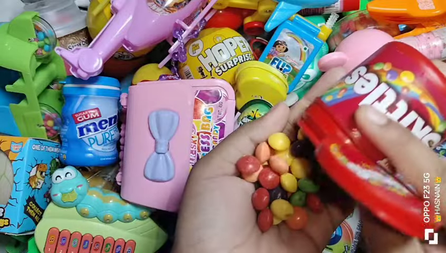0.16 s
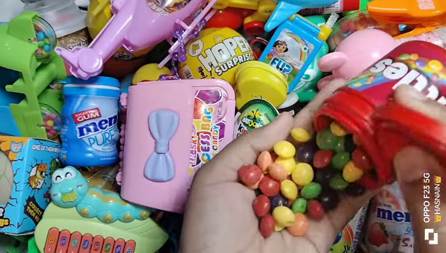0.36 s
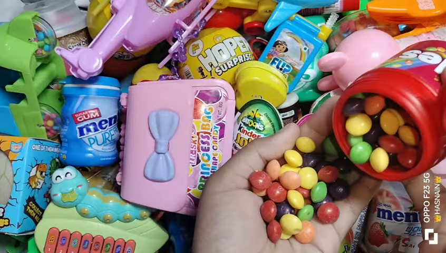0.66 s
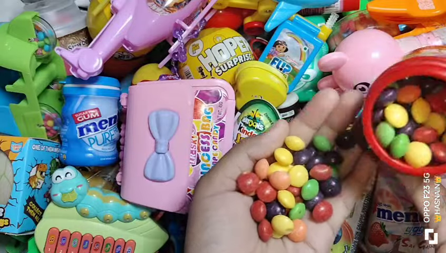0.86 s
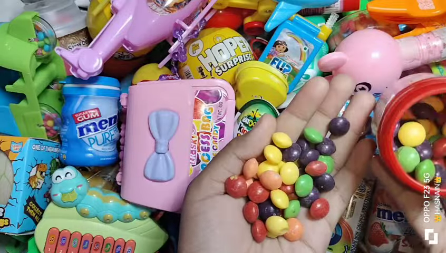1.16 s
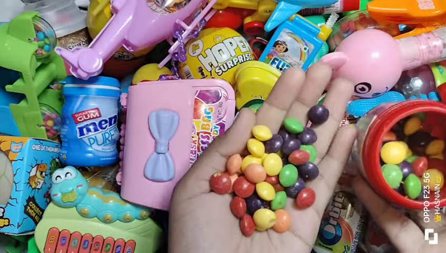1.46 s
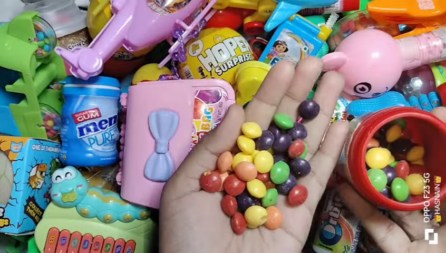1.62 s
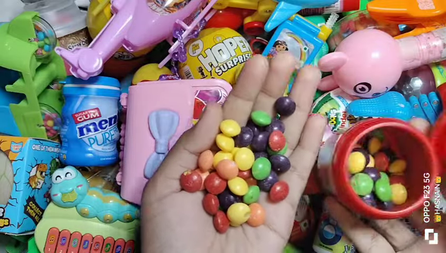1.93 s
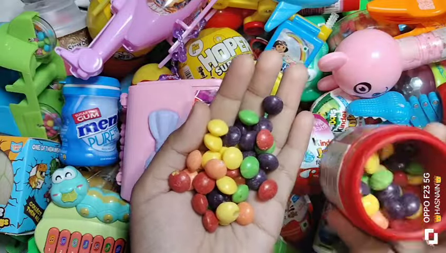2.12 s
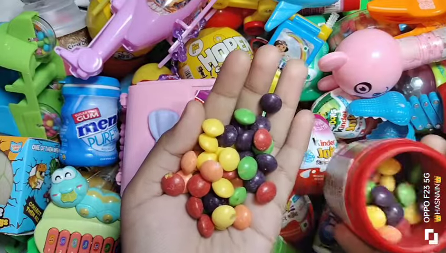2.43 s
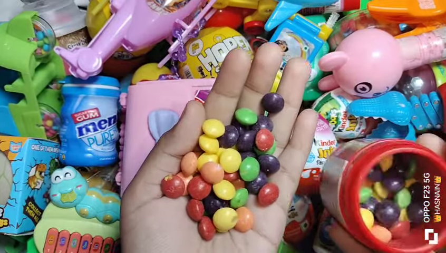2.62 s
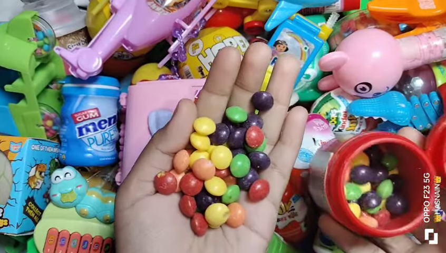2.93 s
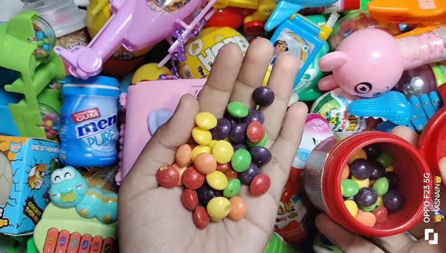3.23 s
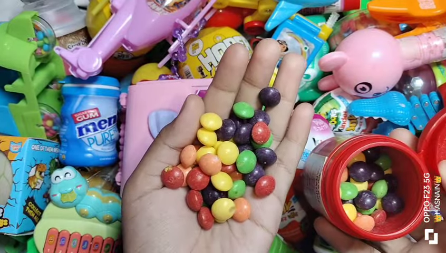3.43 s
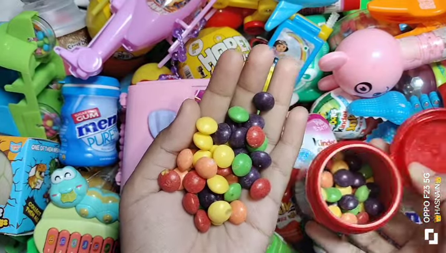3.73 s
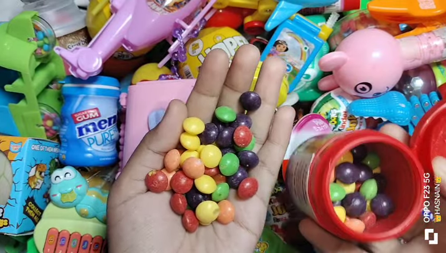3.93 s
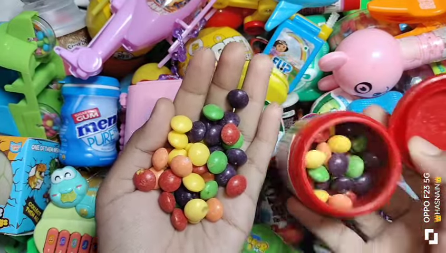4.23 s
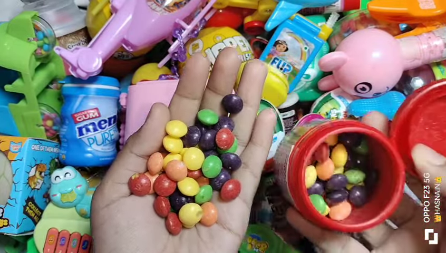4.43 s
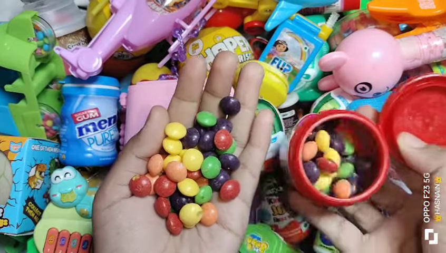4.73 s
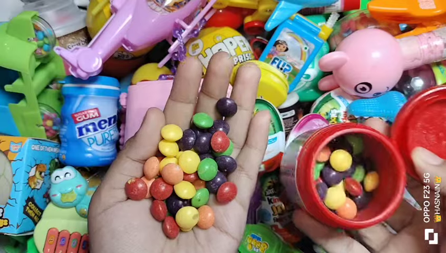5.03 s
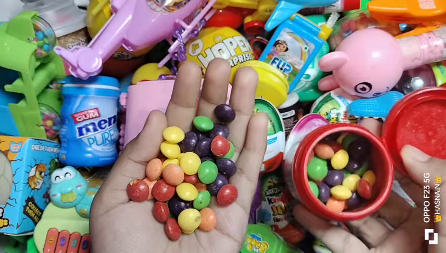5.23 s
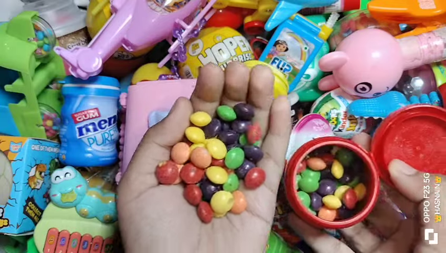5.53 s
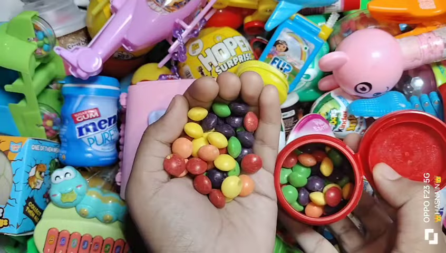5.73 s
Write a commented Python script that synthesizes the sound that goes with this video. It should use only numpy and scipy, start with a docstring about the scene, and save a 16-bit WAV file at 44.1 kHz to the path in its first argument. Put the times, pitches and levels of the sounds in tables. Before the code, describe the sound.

Close up in a small, reflective room, candies hiss and click quietly as they pour, then knock hollowly inside a thin plastic jar. After a brief lull and a rustly slide, the jar is tossed in two series of short crunchy rattles separated by a near-silent gap, ending with settling ticks and faint room drone.

```python
"""Sugar-shelled sweets collide in an open plastic jar: each blow excites the air, the wall and the hard shells.
They slide into a palm, roll back, and are tossed in the jar in two runs of shakes, each a short hail of blows.
Air and wall sound as decaying sine modes, shells as noise bursts with a ping, slides as coloured grains of noise.
The jar is close, off to the right, in a small live room with a faint low drone made of filtered noise."""
import sys
import numpy as np
from scipy import signal
from scipy.fft import rfft, irfft, next_fast_len
from scipy.io import wavfile
from scipy.ndimage import uniform_filter1d, minimum_filter1d

SR = 44100
rng = np.random.default_rng(int(sys.argv[2]) if len(sys.argv) > 2 else 0)


def file_out(sig):
    """Save sig as 16-bit WAV at sys.argv[1]."""
    # one column per channel
    cols = np.atleast_2d(sig).T
    # limit, then scale
    lim = np.clip(cols, -1, 1)
    pcm = np.round(lim * 32767).astype(np.int16)
    wavfile.write(sys.argv[1], SR, pcm)


N = 258867
RING = np.arange(1536) / SR  # time axis of one blow, s
TIME = np.arange(N) / SR  # time axis of the scene, s

# Levels in the tables are relative: mixing and radiation scale them further.
# Single blows that stand out; hardness is shell over air, below 0 a dull blow on the jar:
# [start_s, level_db, hardness_db, wall_extra_db]
KNOCKS = [(.0638, -45, 2, -11), (.078, -42, 1, -3), (.1295, -39, -2, -4), (0.142, -31.5, -1, 0),
          (.1673, -40, -13, -3), (.327, -43, 3, -2), (0.355, -38, -1, -16), (0.39, -38, -3, -10),
          (.4305, -32, -25, 1), (.4449, -31, -5, -5), (.4718, -33.5, -8, -4.5), (.5353, -32.5, -4.5, -13),
          (.6005, -45, 18, -14), (.6317, -41, -12, -9), (.6574, -42, 8, -6), (.7175, -52.5, 23, -10),
          (.8968, -39, -8, -4), (.928, -35, -22, 8), (.9546, -28.5, -11, 6.5), (.9611, -30, -24.5, -4),
          (.987, -17, -10.5, -6), (.9993, -26, -17, 2), (1.0127, -31, -14, 1), (1.0225, -37, 15, 6),
          (1.0524, -27.5, -20.5, -3), (1.0712, -25, -21.5, -2), (1.0799, -24, -16, -3),
          (1.0957, -24, -12, 4), (1.1068, -30.5, -12, 4), (1.1378, -31.5, -5, -2), (1.175, -25, -6.5, -1.5),
          (1.1828, -41, 4, 9), (1.2319, -26, -7, -11), (1.2363, -26, -4, -2), (1.285, -39, -10.5, 5),
          (1.2911, -21.5, -8, 2), (1.3065, -34.5, 2, 2), (1.3659, -33.5, -5, 0.5), (1.3741, -38, 1, -2),
          (1.4127, -40.5, -15, 2), (1.6059, -51, -8, 3), (1.712, -64, 16, -10), (1.7712, -60, 16.5, -7.5),
          (1.8164, -42, -2, 2.5), (1.8337, -50, -2, -3.5), (1.9062, -43, 0, -4), (1.9368, -41, -10, 1.5),
          (2.0507, -44, -13, 8), (2.0846, -33.5, 2, -3), (2.1026, -31.5, -5, 0.5), (2.1187, -33.5, 1, 1),
          (2.153, -30, -5, -3), (2.2591, -28, -11, 3), (2.3461, -40, 11, 2), (2.4324, -28.5, -9, -9.5),
          (2.4422, -32, -22, 1), (2.449, -22, -11, 2), (2.6462, -36.5, -14, 9.5), (2.7176, -32, 1.5, 0),
          (2.9836, -39, -23, 6), (3.0414, -35, -3, 5.5), (3.1128, -54.5, 18, 9), (4.0206, -36, -11, -5.5),
          (4.0515, -24.5, -5.5, -14.5), (4.0579, -32, -11, 0), (4.0699, -28.5, -5, -7.5),
          (4.3456, -41.5, 7, -7.5), (4.5558, -25.5, -6, -14.5), (4.5649, -23, -1, -14),
          (4.7701, -25, -12, -17), (5.2101, -26, -10, -19), (5.228, -32, -11, -6), (5.235, -30.5, -20, 0),
          (5.6388, -60, -2, -6), (5.7042, -60, 24, -8.5), (5.8075, -62.5, 15.5, -6)]
# The heap lands in the jar; loose_db is the jostling of the sweets beforehand:
# [first_s, bulk_s, last_s, level_db, hardness_db, wall_extra_db, loose_db]
SHAKES = [(2.267, 2.2718, 2.279, -27, -2.5, 6.5, -44), (2.456, 2.4608, 2.4728, -16.5, -8, -1.5, -43),
          (2.6662, 2.6798, 2.688, -27.5, -5.5, 2.5, -38.5), (2.8342, 2.8399, 2.858, -22.5, -11, 3, -41),
          (3.019, 3.0207, 3.0268, -36.5, -10, 4.5, -44), (4.0915, 4.105, 4.1197, -15, -7, 2, -53.5),
          (4.363, 4.377, 4.3896, -15, -4.5, 0.5, -42), (4.601, 4.613, 4.626, -13, -8, -0.5, -35),
          (4.8218, 4.824, 4.845, -17.5, -4, 2, -30.5), (5.0361, 5.0545, 5.07, -25.5, -1.5, 2, -39),
          (5.2503, 5.267, 5.286, -24.5, -0.5, 4, -37)]
# Modes of the air in the jar, before random weighting: [ratio_to_air_note, level_db, t60_s]
AIR_MODES = [(.94, -8.5, .018), (1.0, 15.5, 0.027), (1.14, -1, 0.049)]
# Modes of the plastic wall, before random detuning and weighting: [pitch_hz, level_db, t60_s]
WALL_MODES = [(1416, 1.5, 0.021), (1720, -3.5, 0.025), (1770, -1.5, 0.018), (2210, -2.5, 0.013),
              (2300, -10.5, 0.029), (2453, -2, 0.035), (2621, -1.5, 0.07), (2871, 4, 0.024),
              (3150, 3, 0.012), (3693, -8.5, 0.028), (3630, -6.5, 0.006), (4320, -1.5, 0.01),
              (4950, -8.5, 0.014), (5750, -10, 0.017)]
# Spectrum of a shell's crack: [frequency_hz, gain_db]
SHELL_SPECTRUM = [(300, -41.5), (1500, -3.5), (3000, -8), (4200, -2.5), (5200, -2.5), (6300, -3),
                  (7500, -5.5), (9000, -11.5), (12000, -10.5), (14500, -17.5), (16000, -36.5)]
# Path of the jar; the note is lower while the palm covers the mouth:
# [time_s, air_note_hz, right_minus_left_db]
JAR_PATH = [(0, 863, 0), (.45, 907, -1), (1.1, 1042, 0), (1.4, 1113, 1), (3.0, 1097, 1.5),
            (4.6, 1028, -0.5), (5.301, 1068, 0)]
# The jar is tilted and the heap slides: [start_s, fastest_s, end_s, hiss_db, rub_db, tumble_db]
SLIDES = [(0, 0.145, .3, -38.5, -33.5, -44), (.28, .34, 0.48, -50, -47, -48.5),
          (.47, 0.544, 0.8, -42, -46.5, -46), (0.866, 1.08, 1.27, -42.5, -39, -33),
          (1.22, 1.317, 1.5, -53, -50, -47), (1.48, 1.6, 1.67, -77, -64, -56.5),
          (2.02, 2.104, 2.155, -31, -43.5, -36)]
# Spectrum of sliding shells: [frequency_hz, gain_db]
HISS_SPECTRUM = [(500, -28), (1500, -8.5), (3000, -0.5), (4500, -2), (6300, -0.5), (9000, -5), (12000, -4),
                 (14500, -8), (16000, -15.5)]
# Spectrum of the rubbed jar wall: [frequency_hz, gain_db]
RUB_SPECTRUM = [(200, -11), (500, -3), (680, 0), (850, 10.5), (1050, 4), (1300, 3.5), (2000, -0.5),
                (3500, -4.5), (6500, -12), (16000, -33)]
# Decay of the room: [frequency_hz, t60_s]
ROOM_T60 = [(300, 0.84), (1100, 0.72), (3000, 0.52), (6000, 0.67), (14000, 0.27)]
# Spectrum of the diffuse reverberation: [frequency_hz, gain_db]
ECHO_SPECTRUM = [(200, 1.5), (700, 3.5), (950, -3.5), (1200, 2.5), (1500, -6.5), (1900, 2), (2700, 0.5),
                 (6000, -3), (10000, -1), (16000, 4.5)]
# Spectrum of the dull room noise: [frequency_hz, gain_db]
DRONE_SPECTRUM = [(20, -20), (35, 6), (55, 0), (75, -9.5), (120, 7), (180, -4.5), (240, -1.5), (390, -6.5),
                  (520, -8.5), (700, -8), (1200, -14.5), (3000, -26.5), (5000, -41.5), (14000, -55.5)]
# Wavering hum in the room: [pitch_hz, width_hz, level_db]
HUM = [(123.5, 11, -60.5), (237, 10, -70), (390, 44, -69.5)]


def collisions(rows, release_s=0.009):
    """Superposition of impacts: a harder contact trades the boom of the air for the tick of the shell."""
    out, count = np.zeros((2, N)), len(rows)
    jar_s, jar_hz, _ = np.transpose(JAR_PATH)
    air_note_hz = np.interp(np.array(rows)[:, 0], jar_s, jar_hz)
    airs, walls, shells = boom(air_note_hz, count), clack(count), tick(count)
    # fade the end of each ring to silence so that it stops without a click
    taper = np.minimum((RING[-1] - RING) / release_s, 1) ** 2
    for (start_s, level_db, hard_db, wall_db), air, wall, shell in zip(rows, airs, walls, shells):
        blow = undb(-hard_db / 2) * air + undb(wall_db) * wall + undb(hard_db / 2) * shell
        add(out, start_s, taper * undb(level_db) * blow)
    return out


def boom(air_note_hz, count, scatter=.03):
    """Cavity resonance: a blow rings the air modes, and the shifting heap varies their pitch."""
    detune = 1 + scatter * rng.standard_normal((count, 1, 1))
    weights = 1 + 0.9 * rng.standard_normal((count, len(AIR_MODES)))
    phase = 2 * np.pi * air_note_hz[:, None, None] * detune * RING
    ring = 0
    for k, (ratio, db, t60_s) in enumerate(AIR_MODES):
        mode = undb(db) * fade(t60_s) * np.sin(ratio * phase)
        ring = ring + weights[:, k, None, None] * mode
    return attack_level(ring)


def clack(count, apart=1.0, right_db=1.5, scatter=0.026):
    """Modal vibration: each struck spot weights the wall modes; the heap detunes them."""
    hz, db, t60_s = np.transpose(WALL_MODES)
    detuned_hz = hz * (1 + scatter * rng.standard_normal((count, len(hz))))
    phase = np.float32(2 * np.pi * detuned_hz[..., None]) * np.float32(RING)
    modes = np.float32(fade(t60_s[:, None])) * np.sin(phase)
    # one mix shared by both channels, plus one for each: the wall radiates unevenly
    spot = rng.standard_normal((count, 3, len(hz)))
    weights = undb(db) * (spot[:, :1] + apart * spot[:, 1:])
    return attack_level(np.float32(weights) @ modes * undb([[0], [right_db]]))


def tick(count, crack_t60_s=0.0076, rattle_t60_s=0.064, rattle_db=-15, rise_s=0.00088,
         ping_hz=(4000, 14000), ping_t60_s=.02, ping_db=-8):
    """Hard contact: a noise crack, its scatter inside the jar, and a ping pitched by the sweet."""
    scatter = rng.standard_normal((2, len(RING))) * fade(rattle_t60_s)
    noise = rng.standard_normal((count, 2, len(RING)))
    # every tick shares one scatter pattern, with random sign
    rattle = np.sign(noise[..., :1]) * scatter
    crack = noise * fade(crack_t60_s) + undb(rattle_db) * rattle
    low_hz, high_hz = ping_hz
    pitch_hz = low_hz * (high_hz / low_hz) ** rng.random((count, 1, 1))
    sine = fade(ping_t60_s) * np.sin(2 * np.pi * pitch_hz * RING)
    ping = rng.standard_normal((count, 2, 1)) * sine
    shell = attack_level(colour(crack, SHELL_SPECTRUM)) + undb(ping_db) * ping
    return attack_level(shell * (1 - np.exp(-RING / rise_s)))


def hail(count=7, first_db=-4.5, bulk_db=3.5, last_db=1.1, crowd_db=-1.5, rise_db=2.5, fall_db=2.0,
         spread_db=3.5, harden_db=8):
    """Clustered impacts: one sweet leads, the bulk slams, a straggler closes, a crowd falls between."""
    rows = []
    for first, bulk, last, db, hard_db, wall_db, _ in SHAKES:
        landed = staggered(count)
        start_s = first + (last - first) * landed
        swell_db = np.interp(start_s, [first, bulk, last], [-rise_db, 0, -fall_db])
        force_db = crowd_db + swell_db + spread_db * uneven(count)
        rows += [(first, db + first_db, hard_db - harden_db / 2, wall_db),
                 (bulk, db + bulk_db, hard_db, wall_db),
                 (last, db + last_db, hard_db + harden_db / 2, wall_db)]
        # later sweets hit each other instead of the base, so their tone hardens
        crowd_hard_db = hard_db + harden_db * (landed - .5)
        rows += zip(start_s, db + force_db, crowd_hard_db, np.full(count, wall_db))
    return rows


def jostle(count=14, flight_s=.1, gather_db=9, spread_db=2.0, hard_db=-6, wall_db=-3):
    """Rising impact energy: loose sweets bump harder as the heap gathers speed before a landing."""
    rows = []
    for first, *_, loose_db in SHAKES:
        early = staggered(count)
        force_db = loose_db - gather_db * early + spread_db * uneven(count)
        rows += zip(first - flight_s * early, force_db, np.full(count, hard_db), np.full(count, wall_db))
    return rows


def settle(count=12, settle_s=.05, start_db=-6, fall_db=26, hard_db=11, harden_db=16, spread_db=2.5):
    """Dissipation: after each landing the sweets shuffle into place with light ticks that die away."""
    rows = []
    for _, _, last, db, heap_hard_db, wall_db, _ in SHAKES:
        age = staggered(count)
        force_db = start_db - fall_db * age + spread_db * uneven(count)
        tone_db = heap_hard_db + hard_db + harden_db * age
        rows += zip(last + settle_s * age, db + force_db, tone_db, np.full(count, wall_db))
    return rows


def rock(count=9, rock_s=.16, start_db=-18, fall_db=9, hard_db=-7, wall_db=-3, spread_db=3.0):
    """Damped rocking: a few sweets go on bumping dully against the base."""
    rows = []
    for _, _, last, db, *_ in SHAKES:
        age = staggered(count)
        force_db = start_db - fall_db * age + spread_db * uneven(count)
        rows += zip(last + rock_s * age, db + force_db, np.full(count, hard_db), np.full(count, wall_db))
    return rows


def tumble(count=14, spread_db=4.0, hard_db=1.5, tone_spread_db=8, wall_db=0.5):
    """Granular flow: sweets tip over each other all through a slide, most strongly when it is fastest."""
    rows = []
    for start, fastest, end, _, _, db in SLIDES:
        start_s = start + (end - start) * staggered(count)
        force_db = db + slide_db(start_s, start, fastest, end) + spread_db * uneven(count)
        tone_db = hard_db + tone_spread_db * uneven(count)
        rows += zip(start_s, force_db, tone_db, np.full(count, wall_db))
    return rows


def sliding(hiss_db=-3.0, rub_db=-4.5, apart=0.3, onset_s=0.021):
    """Friction noise: sliding shells hiss; the wall, rubbed by hand and heap, rasps lower."""
    hiss_gain = rub_gain = 0
    for start, fastest, end, shells_db, jar_db, _ in SLIDES:
        edges = np.clip(np.minimum(TIME - start, end - TIME) / onset_s, 0, 1)
        speed = undb(slide_db(TIME, start, fastest, end)) * edges
        hiss_gain = hiss_gain + undb(shells_db) * speed
        rub_gain = rub_gain + undb(jar_db) * speed
    mid, side = catches()
    rub = unit(colour(widen(mid, side, apart), RUB_SPECTRUM))
    hiss = unit(colour(catches(), HISS_SPECTRUM))
    return undb(hiss_db) * hiss_gain * hiss + undb(rub_db) * rub_gain * rub


def slide_db(t, start, fastest, end, rise_db=12.5, fall_db=20.5):
    """Friction follows speed: the level swells to the fastest moment, then sinks."""
    return np.interp(t, [start, fastest, end], [-rise_db, 0, -fall_db])


def catches(per_s=800, t60_s=.005):
    """Stick-slip: dense tiny slips of uneven size, each a puff of noise, unrelated in two channels."""
    slips = (rng.random(N) < per_s / SR) * undb(3 * rng.standard_normal(N))
    return signal.fftconvolve(slips, fade(t60_s))[:N] * rng.standard_normal((2, N))


def radiate(x, low_hz=915, order=5, base_hz=380, base_width_hz=150, base_db=-7.5,
            thump_hz=300, thump_db=-19):
    """Radiation efficiency: a small jar gives off little bass, save base flexing and a thump in the hand."""
    mouth = signal.sosfilt(signal.butter(order, low_hz, "high", fs=SR, output="sos"), x)
    peak = signal.iirpeak(base_hz, base_hz / base_width_hz, fs=SR)
    base = signal.lfilter(*peak, signal.lfilter(*peak, x))
    thump_band = signal.butter(2, [thump_hz / 2, thump_hz], "band", fs=SR, output="sos")
    thump = signal.sosfilt(thump_band, x)
    return mouth + undb(base_db) * base + undb(thump_db) * thump


def place(x):
    """Interchannel delay and level: the jar is off to the right, so the left lags by two samples."""
    jar_s, _, right_db = np.transpose(JAR_PATH)
    delayed = np.array([np.pad(x[0], (2, 0))[:N], x[1]])
    return delayed * undb(np.interp(TIME, jar_s, right_db) * np.array([[-.5], [.5]]))


def room(dry, near_db=-12, near_t60_s=0.038, tail_db=-10.0, first_s=0.0019, build_s=0.0013):
    """Reverberation: quick reflections off the hand and toys, then the diffuse ring of hard walls."""
    t = np.arange(SR) / SR
    hz = np.fft.rfftfreq(SR, 1 / SR)
    centres_hz = np.geomspace(200, 16000, 8)
    noise = rfft(rng.standard_normal((2, SR)))
    tail = 0
    for centre_hz, band in zip(centres_hz, np.eye(len(centres_hz))):
        band_noise = irfft(noise * np.interp(hz, centres_hz, band), SR)
        tail = tail + band_noise * fade(along(ROOM_T60, centre_hz), t)
    tail = colour(tail * (1 - np.exp(-t / build_s)), ECHO_SPECTRUM)
    near = rng.standard_normal((2, SR)) * fade(near_t60_s, t)
    arrived = t > first_s
    response = undb(near_db) * unit(near * arrived) + undb(tail_db) * unit(tail * arrived)
    # dividing by sqrt(SR) gives each unit-rms part unit energy
    return signal.fftconvolve(dry, response / np.sqrt(SR), axes=1)[:, :N]


def drone(air_db=-55.5):
    """Narrow-band noise wavers: low hums over dull room noise that is nearly alike in both channels."""
    mid, side, stir = rng.standard_normal((3, N))
    air = unit(colour(widen(mid, side, .35), DRONE_SPECTRUM))
    stir = colour(stir, [(400, 0), (1200, -30)])
    hum = 0
    for hz, width_hz, db in HUM:
        peak = signal.iirpeak(hz, hz / width_hz, fs=SR)
        hum = hum + undb(db) * unit(signal.lfilter(*peak, stir))
    return undb(air_db) * air + hum


def undb(db):
    """Decibel law: amplitude ratio of a level."""
    return 10 ** (np.asarray(db) / 20)


def unit(x):
    """Normalisation to an rms of 1."""
    return x / np.sqrt(np.mean(x ** 2))


def attack_level(x, size=88):
    """Normalisation of a blow to rms 1 over its first two milliseconds."""
    return x / np.sqrt(np.mean(x[..., :size] ** 2, axis=(-2, -1), keepdims=True))


def fade(t60_s, t=RING):
    """Exponential decay: amplitude falls by 60 dB in t60_s."""
    return np.exp(-np.log(1000) * t / t60_s)


def along(points, hz):
    """Logarithmic frequency scale: interpolate a table along it."""
    f, value = np.transpose(points)
    return np.interp(np.log(np.maximum(hz, 1)), np.log(f), value)


def colour(x, points):
    """Linear filtering: multiply the spectrum by a curve of (Hz, dB) points."""
    length = x.shape[-1]
    size = next_fast_len(length, real=True)
    gain = undb(along(points, np.fft.rfftfreq(size, 1 / SR)))
    return irfft(rfft(x, size) * gain, size)[..., :length]


def widen(mid, side, apart):
    """Mid-side stereo: a side part of opposite sign sets the channels apart."""
    return mid + apart * side * np.array([[1], [-1]])


def add(track, start_s, sound):
    """Superposition: mix a sound in at its start time."""
    i = max(int(start_s * SR), 0)
    track[:, i:i + sound.shape[1]] += sound[:, :max(N - i, 0)]


def staggered(count):
    """Stratified chance: uneven moments from 0 to 1, in order."""
    return (np.arange(count) + rng.random(count)) / count


def uneven(count):
    """Random permutation: weak to strong, -1 to 1, shuffled."""
    return rng.permutation(np.linspace(-1, 1, count))


def scene(knock_db=-0.96, hail_db=-0.4):
    """Superposition of knocks, shakes and slides, their reverberation and the drone."""
    knocks = undb(knock_db) * collisions(KNOCKS)
    landings = undb(hail_db) * collisions(hail())
    loose = collisions(jostle() + settle() + rock() + tumble())
    sweets = place(radiate(knocks + landings + loose) + sliding())
    return sweets + room(sweets) + drone()


def record(dry, ceiling=0.96, size=128, top_hz=15800):
    """Peak limiting and band limiting: a smoothed gain holds the peaks, then the top is cut."""
    needed = ceiling / np.maximum(np.abs(dry).max(axis=0), ceiling)
    gain = uniform_filter1d(minimum_filter1d(needed, size), size)
    low_pass = signal.ellip(10, .2, 80, top_hz, fs=SR, output="sos")
    return signal.sosfilt(low_pass, dry * gain)


dry = scene()
out = record(dry)
file_out(out)
```